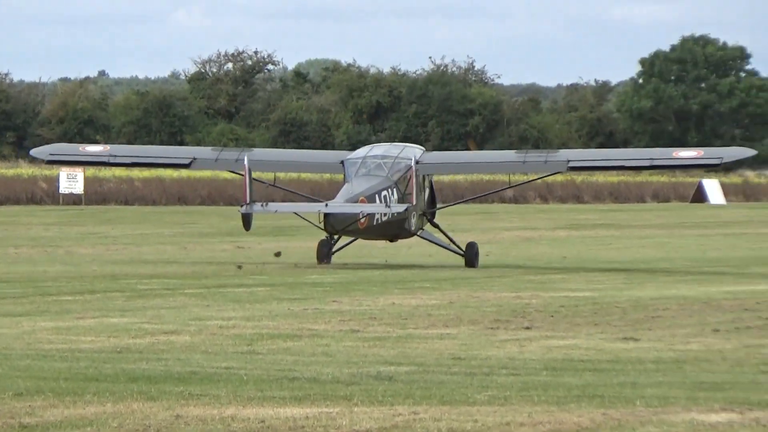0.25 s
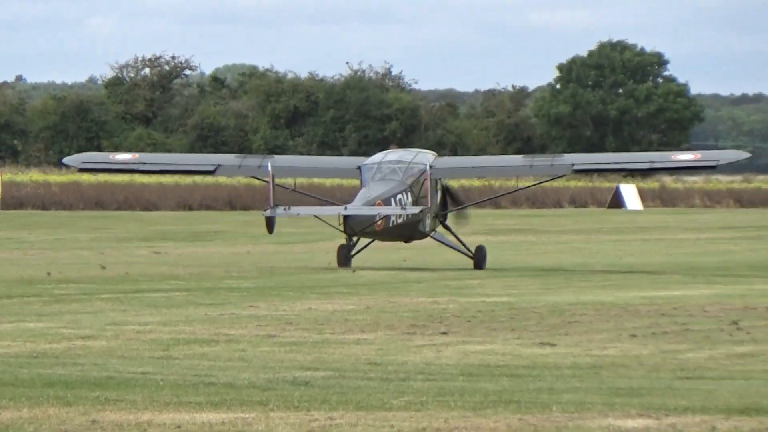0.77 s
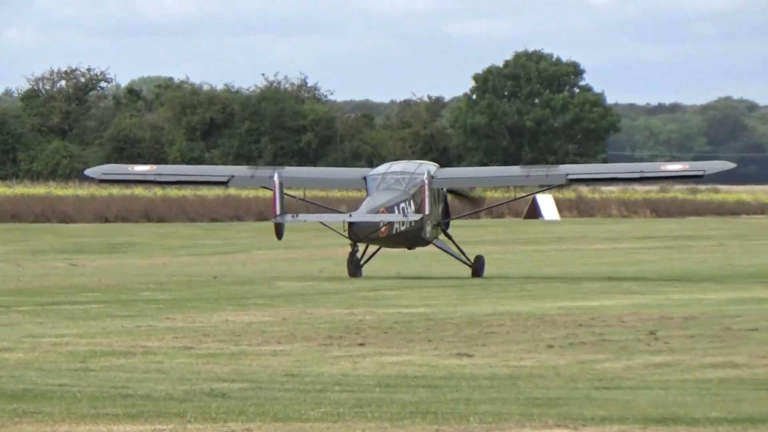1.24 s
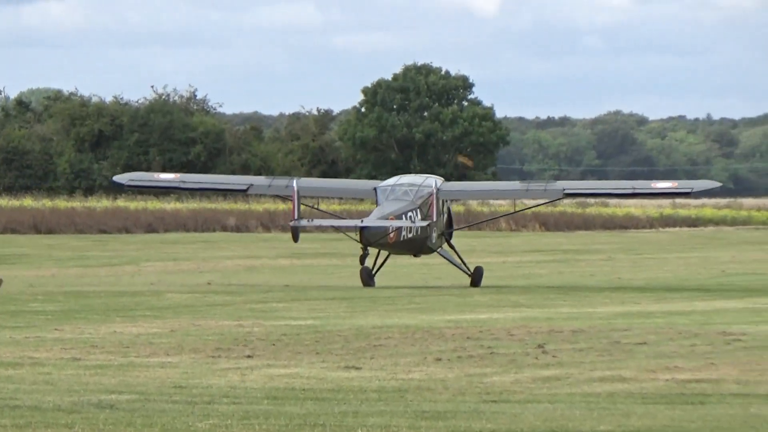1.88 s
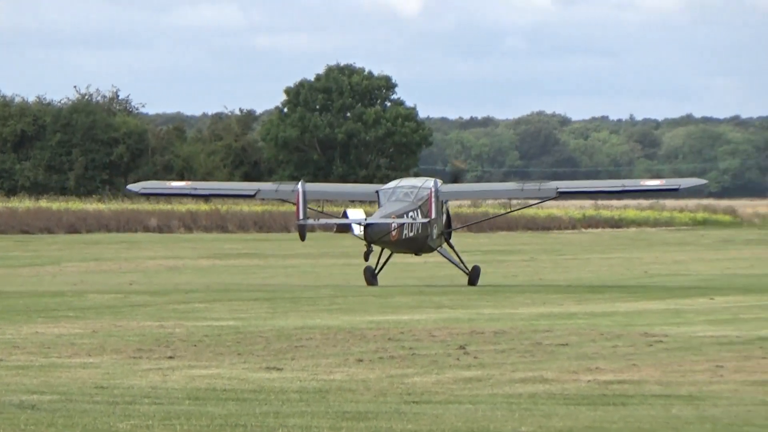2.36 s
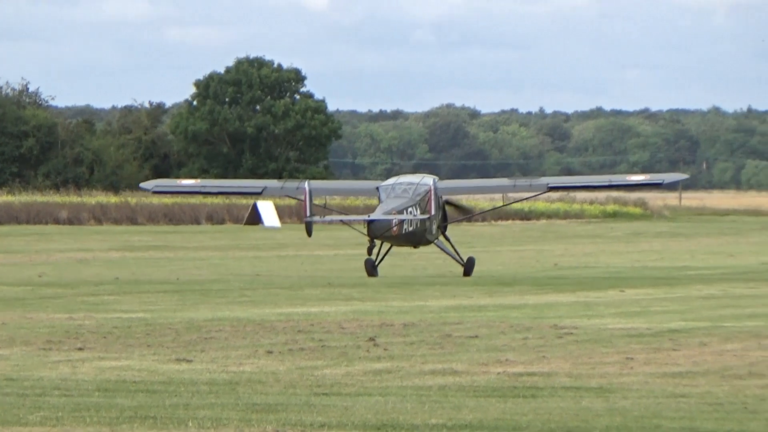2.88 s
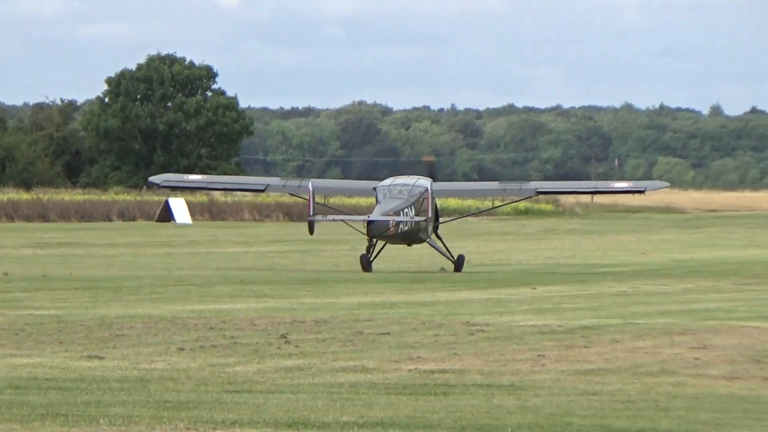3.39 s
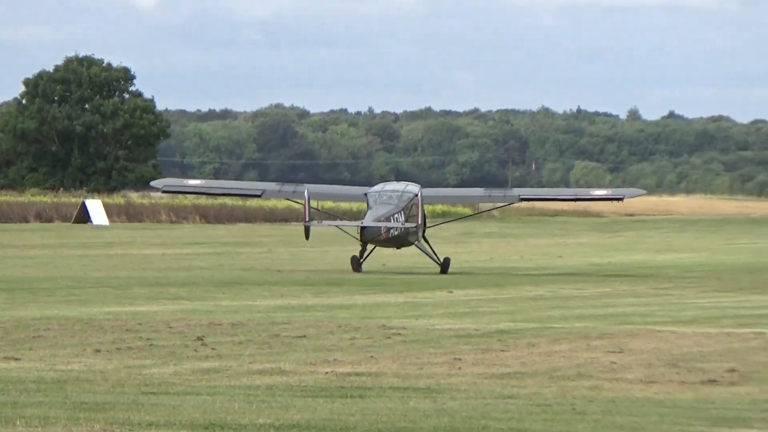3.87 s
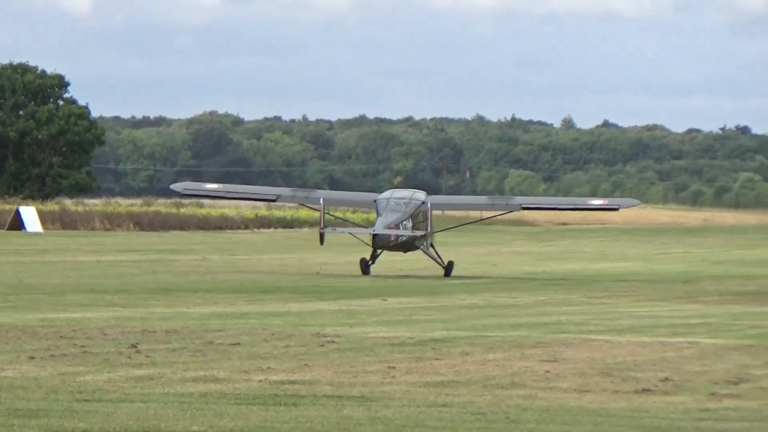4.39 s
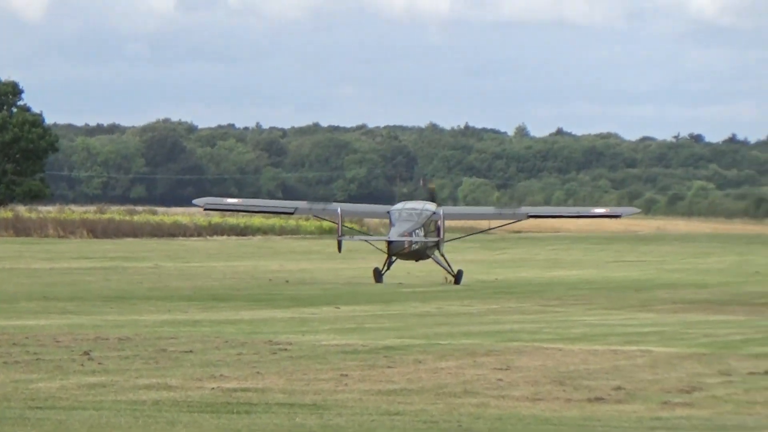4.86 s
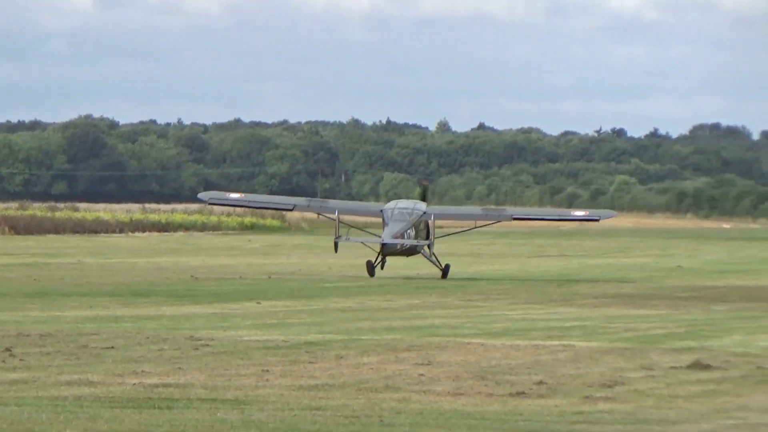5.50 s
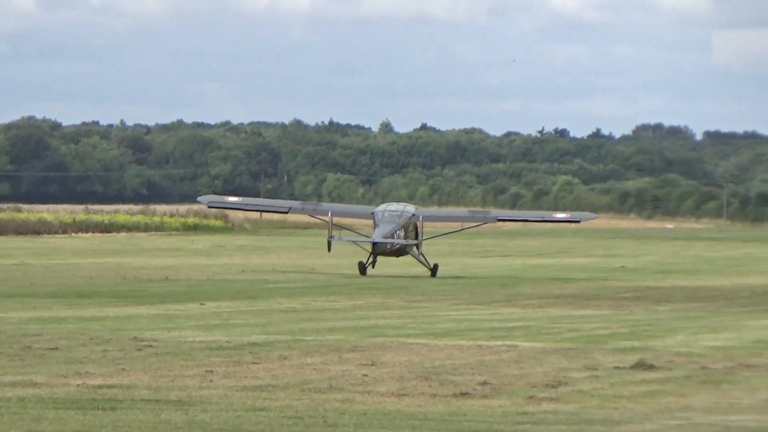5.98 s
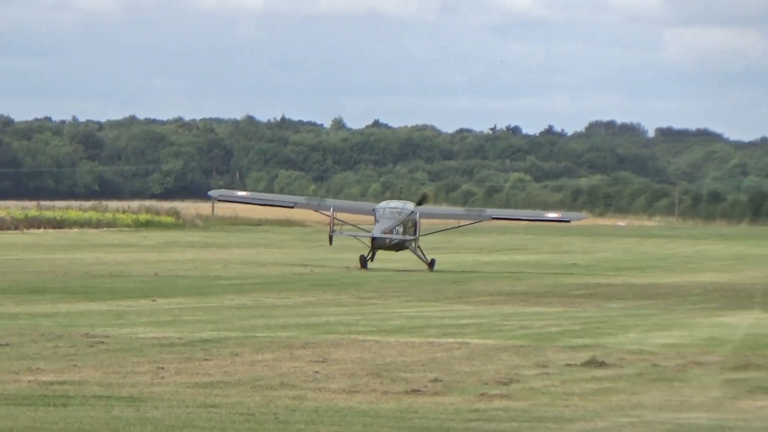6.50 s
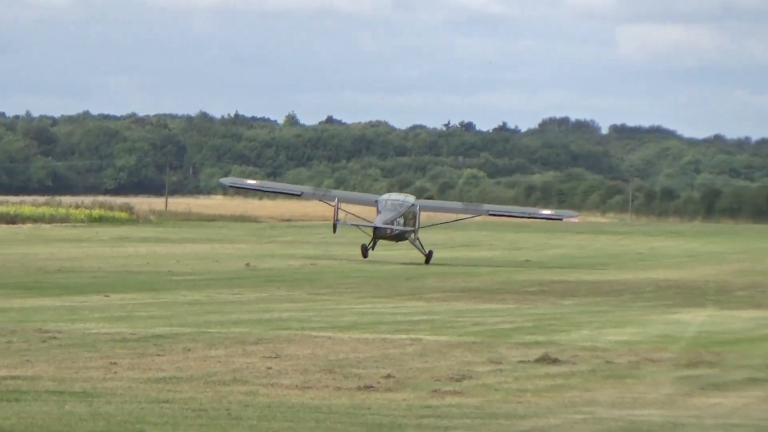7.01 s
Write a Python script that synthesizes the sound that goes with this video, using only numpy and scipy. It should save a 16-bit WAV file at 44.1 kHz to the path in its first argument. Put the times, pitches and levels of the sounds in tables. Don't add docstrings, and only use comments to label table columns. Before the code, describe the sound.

Heard from behind by a handheld camera, a light aircraft accelerates away over grass. A steady low blade drone carries bright, rapidly pulsing hiss and swishing blade tips, swelling and dipping in moving air. The engine thins with distance, its bass fading after four seconds, while close wind buffeting takes over the foreground until the end. Nearly mono, open air, no echo.

```python
import sys
import numpy as np
from scipy import signal
from scipy.fft import rfft, irfft, next_fast_len
from scipy.io import wavfile
from scipy.ndimage import uniform_filter1d, map_coordinates

SR = 44100
rng = np.random.default_rng(int(sys.argv[2]) if len(sys.argv) > 2 else 0)


def attenuation_scalar(level_db):
    decades = np.asarray(level_db, float) / 20
    return 10 ** decades


def inscribe(sig):
    pcm = np.round(np.clip(np.atleast_2d(sig).T, -1, 1) * 32767)
    wavfile.write(sys.argv[1], SR, pcm.astype(np.int16))


N = 319706


def unit(x):
    return x / np.sqrt(np.mean(x ** 2) + 1e-20)


def curve(rows):
    seconds, values = np.transpose(rows)
    return np.interp(np.arange(N) / SR, seconds, values)


def wobble(rate):
    steps = np.arange(0, N * rate / SR + 1, 1 / 8)
    smooth = map_coordinates(rng.standard_normal(int(steps[-1]) + 4), [steps])
    return np.interp(np.arange(N) * rate / SR, steps, smooth)


def coloured(x, points):
    size = next_fast_len(N + 8192)
    hz, db = np.transpose([(1, -120)] + list(points) + [(SR / 2, -120)])
    bins_hz = np.fft.rfftfreq(size, 1 / SR)
    gain = attenuation_scalar(np.interp(np.log(bins_hz + 1), np.log(hz), db))
    return unit(irfft(rfft(x, size) * gain, size)[..., :N])


def pair(side_db, patchy_db=0):
    mid, side = noise = rng.standard_normal((2, N))
    if patchy_db:
        z = signal.stft(noise, nperseg=512)[2]
        field = rng.standard_normal(z.shape[1:])
        field = uniform_filter1d(uniform_filter1d(field, 8, 0), 8, 1)
        mid, side = signal.istft(z * attenuation_scalar(patchy_db * unit(field)), nperseg=512)[1][:, :N]
    return np.array([mid + attenuation_scalar(side_db) * side, mid - attenuation_scalar(side_db) * side])


def preamp_hiss():
    # time in seconds, hiss level in dB.
    hiss_level = [(0, -65), (2, -62), (4.5, -61), (4.6, -66), (4.72, -61), (7.25, -58)]
    hiss = coloured(pair(side_db=-60), [(300, 2), (8000, 4.0), (15750, 2.0), (16000, -52)])
    return attenuation_scalar(curve(hiss_level)) * hiss


def puffs():
    # middle in seconds, half length in seconds, strength in dB, air speed from 0 to 1.
    gust_list = [(0.016, .07, -31, 0.05), (.35, 0.073, -20, .76), (0.741, 0.15, -30, .15),
                 (1.216, 0.038, -32, 0.2), (1.582, 0.091, -24, 0.17), (1.75, 0.071, -27, .7),
                 (2.066, 0.061, -26, .55), (3.061, 0.036, -23.5, 0.19), (3.87, 0.15, -29.5, 0),
                 (4.047, 0.034, -19, 0.31), (4.127, 0.051, -16, 0.63), (4.261, 0.033, -23.5, 0.2),
                 (4.401, .05, -20.5, .95), (4.58, 0.11, -17, 1.02), (4.769, 0.12, -19, 1.02),
                 (4.958, 0.09, -18, 1), (5.3, .12, -26, .58), (5.5, 0.063, -19, .82),
                 (5.691, 0.077, -23, .42), (5.769, 0.0279, -17, 0.78), (5.901, 0.11, -16, 0.51),
                 (6.019, 0.056, -18.5, 0.88), (6.11, 0.061, -19, 0.63), (6.25, 0.091, -19, .95),
                 (6.436, 0.043, -21, 0.74), (6.539, 0.027, -28.5, .7), (6.681, 0.048, -20.5, 0.38),
                 (6.838, 0.072, -21.5, .9), (7.029, 0.065, -21.5, 0.92), (7.18, 0.074, -19, .97)]
    reach, edge = 1.193, 1.85
    sag = 0.38
    t = np.arange(0, N + 64, 64) / SR
    middle, half, db, top_speed = np.transpose(gust_list)[..., None]
    away = np.abs(t - middle) / (reach * half)
    speed = top_speed * (1 - sag * (1 - np.exp(-away ** 3.2)))
    return t, db - 8.7 * away ** edge, speed


def gusts(slow_db, fast_db, turn, spread, calm_db):
    # time in seconds, level of the steady air in dB.
    breeze = [(0, 7), (1.5, 3.5), (2.3, 4.5), (3.5, -1), (4.2, 5), (5.2, 8), (6.5, 6), (7.25, 5)]
    t, db, speed = puffs()
    fast_share = 1 / (1 + np.exp((turn - speed) / spread))
    gain = np.linalg.norm(attenuation_scalar(db + slow_db + fast_db * fast_share), axis=0)
    return np.interp(np.arange(N) / SR, t, gain) + attenuation_scalar(calm_db + curve(breeze))


def swirl():
    t, db, speed = puffs()
    power = attenuation_scalar(db) ** 2 + 1e-12
    total = power.sum(axis=0)
    mean_speed = (power * speed).sum(axis=0) / total
    sample_t = np.arange(N) / SR
    gain = np.interp(sample_t, t, np.sqrt(total))
    speed = np.interp(sample_t, t, mean_speed)
    drift = np.exp(.16 * (wobble(22) + .6 * wobble(90)))
    hz = (69.96 + 330 * speed ** 1.5) * drift
    return gain * attenuation_scalar(-6.5 + 3.4 * wobble(45)) * np.sin(2 * np.pi * np.cumsum(hz) / SR)


def sweep(x, count):
    return np.array([x[0], np.roll(x[1], count)])


def wind():
    # dB over the gust in slow air, dB more in fast air, speed of the change from 0 to 1,
    # spread of that change in the same speed units, dB between gusts.
    eddies = [
        (1, -15, 0.24, 0.058, -40.5),
        (-9.5, 8, .15, 0.052, -44),
        (-25, 27, 0.48, .15, -54),
        (-44.5, 40, 0.73, 0.089, -64),
    ]
    # pitch in Hz, strength in dB per Hz.
    thud_colour = [(20, -18), (40, -15.5), (70, -5.5), (110, -4.5), (150, -8.5), (220, -18.5)]
    buffet_colour = [(70, -47), (120, -6), (170, -0.5), (260, -1), (330, -7.5), (450, -34)]
    rasp_colour = [(220, -39), (320, -0.5), (420, -3), (600, -8), (800, -12.5), (1200, -18)]
    fizz_colour = [(500, -22.5), (750, 4), (1100, 5), (1700, 3), (2600, -1), (3400, -10), (5000, -45)]
    thud_gain, buffet_gain, rasp_gain, fizz_gain = [gusts(*eddy) for eddy in eddies]
    lumps, grit = wobble(35), wobble(150)
    thud = coloured(pair(side_db=-17.5) * attenuation_scalar(2.0 * lumps + 2.64 * wobble(12)), thud_colour)
    buffet = coloured(pair(side_db=-16) * attenuation_scalar(1.9 * lumps + 1.4 * wobble(70)), buffet_colour)
    rasp = coloured(pair(side_db=-13) * attenuation_scalar(0.3 * lumps + 2.3 * grit), rasp_colour)
    fizz = coloured(pair(side_db=-37) * attenuation_scalar(.5 * lumps + 3.5 * wobble(260)), fizz_colour)
    slow = thud_gain * thud + buffet_gain * buffet
    fast = sweep(rasp_gain * rasp + fizz_gain * fizz, count=3)
    push = swirl() + slow + fast
    return push / (1 + (push.mean(axis=0) / 0.43) ** 4) ** (1 / 4)


def cowling():
    # time in seconds, peak level in dB, pitch in Hz.
    pings = [(0.0064, -5.5, 3670), (0.0124, -11, 3520), (0.0194, -11, 3560), (0.0394, -9, 2720),
             (0.059, -8, 2750), (0.0684, -11, 2770), (0.167, -9, 2760), (0.2013, -15, 2100),
             (0.2208, -14, 2950), (0.2752, -12, 2290), (0.3383, -12, 2820), (0.3839, -8.5, 3055),
             (0.4188, -12, 3510), (0.4363, -8, 3320), (2.5343, -18, 2240), (2.5477, -12, 2210),
             (2.572, -7.5, 2220), (2.6139, -12, 2170), (2.6253, -8, 2190), (2.6657, -18, 2910),
             (2.678, -8.5, 2110), (2.996, -9.5, 2260), (3.1023, -8.5, 2010), (3.195, -12, 2420),
             (3.208, -10, 2230), (3.2605, -19, 1660), (3.3149, -13.5, 3010), (3.991, -14, 2300),
             (4.321, -15.5, 3605)]
    # time in seconds, peak level in dB, pitch in Hz.
    ticks = [(0.0194, -15, 4430), (0.0254, -9, 4400), (0.0634, -15, 3560), (0.2299, -9.5, 4330),
             (0.2833, -15, 5940), (0.3646, -14, 5070), (2.0966, -15, 4440), (2.7884, -15, 4200),
             (3.473, -17.5, 3500), (3.5947, -16.5, 3700), (4.3244, -20, 3800), (4.3344, -19, 3666)]
    out, t = np.zeros(N + SR), np.arange(800) / SR
    for s, db, hz in [*pings, *ticks]:
        rough = 0.15 * np.cumsum(uniform_filter1d(rng.standard_normal(len(t)), size=12))
        fade = attenuation_scalar(db + 0.1 - 60 * t / 0.022)
        onset = 1 - np.exp(-(t / 0.00083) ** 2)
        out[round(s * SR):][:len(t)] += fade * onset * np.sin(2 * np.pi * hz * t + rough)
    return out[:N]


def blade_beats():
    # time in seconds, blade beats per second in Hz.
    beat_rate = [(0, 73.8), (.5, 74.05), (1, 74.2), (1.4, 75.25), (1.6, 75.49), (4.2, 75.47), (4.6, 74.85),
                 (5.9, 74.9), (7.25, 74.6)]
    return .42 + np.cumsum(curve(beat_rate)) / SR


def propeller_drone(beats):
    # multiple of the blade beat, level in dB.
    tones = [(0.751, -10.5), (1, -0.5), (1.25, -7), (1.75, -7), (2, 0), (2.25, -7), (2.5, -27),
             (2.75, -7.5), (3, -3.5), (3.25, -9), (3.752, -17.5), (4, -13), (5, -23.5)]
    drone = 0
    for k, db in tones:
        sign = -np.sign(abs(k % 1 - .65) - .2)
        drone = drone + sign * attenuation_scalar(db) * np.cos(2 * np.pi * k * beats)
    return unit(attenuation_scalar(.9 * wobble(4)) * drone)


def bursts(turns, late, rise, fall, scatter_db):
    whole, part = np.divmod(turns - late + 4, 1)
    size = attenuation_scalar(scatter_db * rng.standard_normal(int(whole[-1]) + 2))
    shape = (1 - np.exp(-(part / rise) ** 2)) * np.exp(-part / fall)
    return size[whole.astype(int)] * shape * (1 + rise / fall) ** 2


def exhaust_spit(beats):
    return attenuation_scalar(-1) * bursts(beats, late=0.907, rise=0.096, fall=0.17, scatter_db=2.5)


def stack_crack(beats, swell_db):
    crack = bursts(beats / 4, late=.25, rise=0.024, fall=0.058, scatter_db=1.5)
    return attenuation_scalar(5 - .7 * swell_db) * crack


def blade_swish(beats, rolled, swell_db):
    one = bursts(beats / 2, late=0.67, rise=0.053, fall=0.041, scatter_db=3.0)
    other = bursts(beats / 2, late=0.2, rise=0.079, fall=0.035, scatter_db=3.5)
    swish_db = np.minimum(4.5 - 0.62 * rolled + 2.2 * swell_db, 8)
    return attenuation_scalar(swish_db) * (one + 0.9 * other)


def aircraft():
    # time in
    # seconds, level in dB.
    swell = [(0, 2.5), (.22, 1), (.33, 5), (.44, 2.5), (.55, -2.5), (1.07, 1.5), (1.33, -1), (1.62, 1.5),
             (1.94, 0), (2.34, 4.5), (2.8, 2), (3.25, 3.5), (3.8, 1.5), (4.35, 0), (4.58, -3), (4.8, 1),
             (5.9, -1), (7.25, -4)]
    # time in seconds, left minus right level in dB.
    balance = [(0, 0.9), (1, 1.5), (3, 0.96), (4.5, 0.5), (7.25, -0.5)]
    # pitch in Hz, strength in dB per Hz.
    growl_colour = [(250, -53), (350, -19), (470, -15.5), (620, -9), (900, -8.5), (1380, -3), (1900, -7.5),
                    (2500, -20)]
    roar_colour = [(1300, -20), (1800, -8.5), (2200, 2), (2600, -2), (2950, 0.5), (4000, -5.5),
                   (4700, -8.5), (8000, -20)]
    sizzle_colour = [(3000, -16), (4500, -2.5), (5500, -2.5), (7500, -4.5), (9000, -1), (10500, -11.5),
                     (12000, -20.5), (14500, -42)]

    t = np.arange(N) / SR
    start_m = 36.1
    rolled = 3.55 * t + 0.69 * t ** 2 / 2
    spread_db = -20 * np.log10(1 + rolled / start_m)
    swell_db = curve(swell)

    shadow_db = 23 / (1 + np.exp((56.8 - start_m - rolled) / 0.97))
    drone_db = -27 + spread_db - shadow_db
    growl_db = -27 + spread_db - 0.11 * rolled + 0.083 * swell_db
    roar_db = -25.5 + spread_db - 0.14 * rolled + 0.54 * swell_db
    sizzle_db = -31.5 + spread_db - 0.41 * rolled + 1.13 * swell_db

    beats = blade_beats()
    low_spit, high_spit = exhaust_spit(beats), exhaust_spit(beats)
    low_crack, high_crack = stack_crack(beats, swell_db), stack_crack(beats, swell_db)
    swish = blade_swish(beats, rolled, swell_db)
    flutter = attenuation_scalar(0.11 * wobble(9) + 0.69 * wobble(60))

    growl_pulse = 1 + .4 * low_spit + 0.21 * low_crack
    roar_pulse = 1 + .9 * low_spit + 0.91 * low_crack + 0.25 * swish
    sizzle_pulse = 1 + .9 * high_spit + 0.94 * high_crack + 1.48 * swish
    growl = coloured(pair(side_db=-22.5) * growl_pulse, growl_colour)
    roar = coloured(pair(side_db=-26.5, patchy_db=1.5) * flutter * roar_pulse, roar_colour)
    sizzle = coloured(pair(side_db=-62, patchy_db=1.8) * flutter * sizzle_pulse, sizzle_colour)

    left_db = curve(balance) / 2
    body = attenuation_scalar(growl_db) * growl + attenuation_scalar(roar_db) * roar + cowling()
    body = body * attenuation_scalar(np.array([left_db, -left_db]))
    return attenuation_scalar(drone_db) * propeller_drone(beats) + body + attenuation_scalar(sizzle_db) * sizzle


def scene():
    return wind() + aircraft()


def roll_off(x):
    return signal.sosfilt(signal.butter(12, 15800, fs=SR, output="sos"), x)


def record(dry):
    x = dry + preamp_hiss()
    x = x / (1 + np.abs(x.mean(axis=0) / 1.0) ** 4) ** (1 / 4)
    return roll_off(x)


dry = scene()
out = record(dry)
inscribe(out)
```